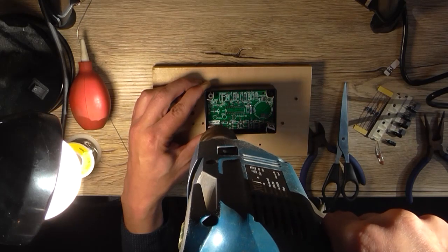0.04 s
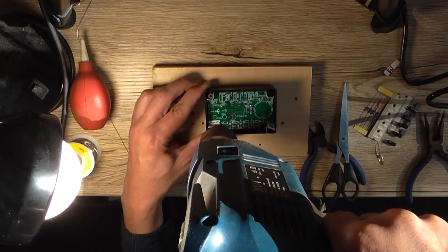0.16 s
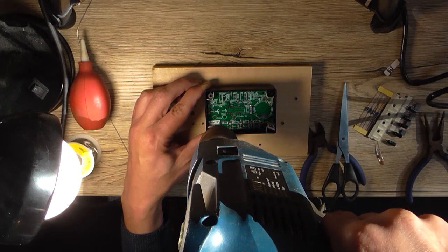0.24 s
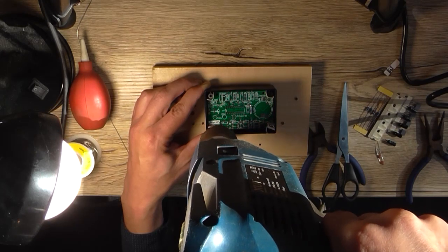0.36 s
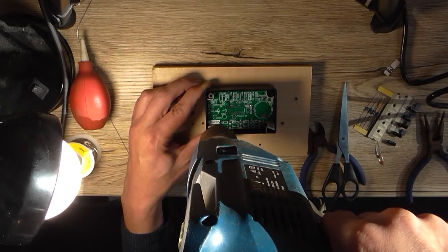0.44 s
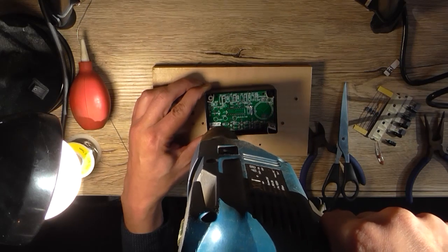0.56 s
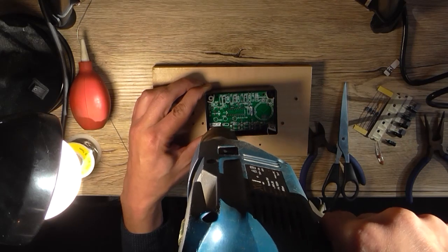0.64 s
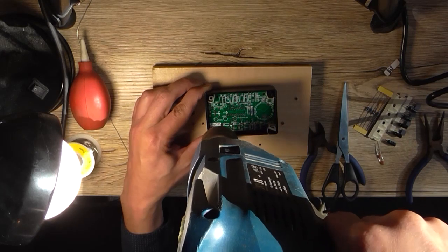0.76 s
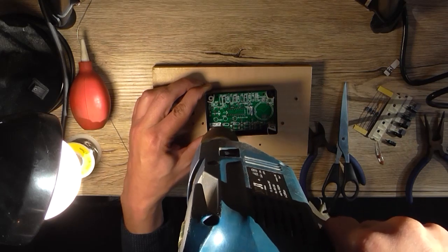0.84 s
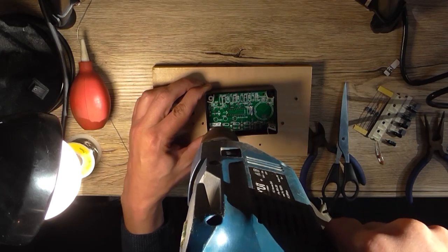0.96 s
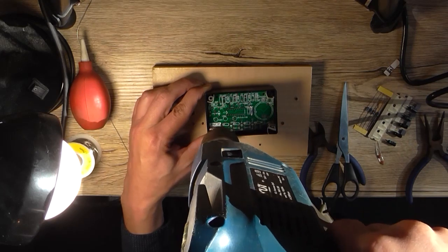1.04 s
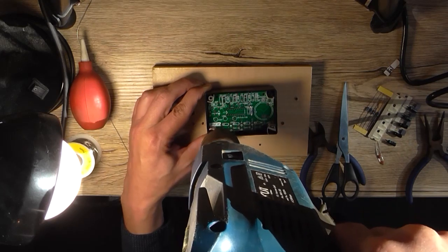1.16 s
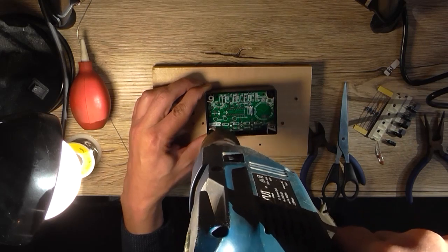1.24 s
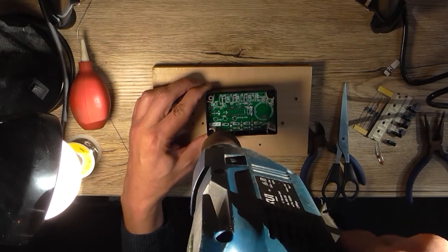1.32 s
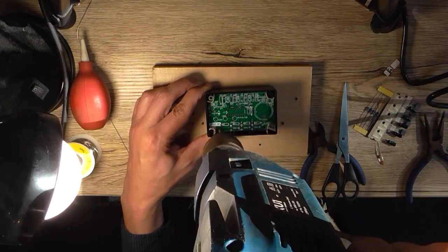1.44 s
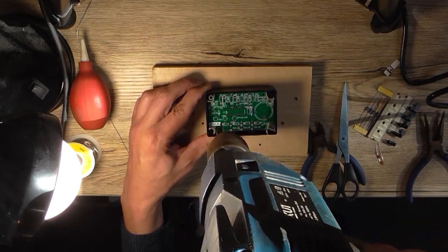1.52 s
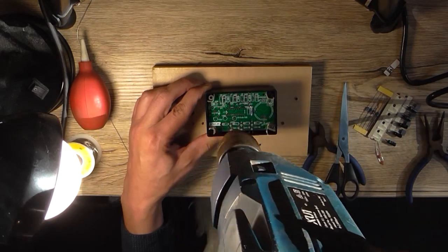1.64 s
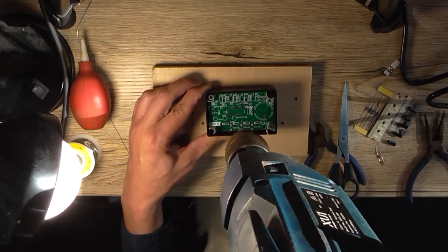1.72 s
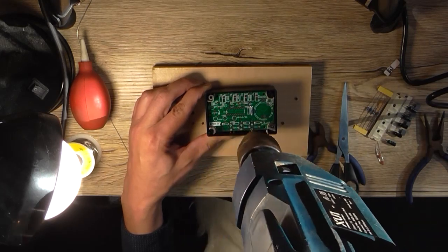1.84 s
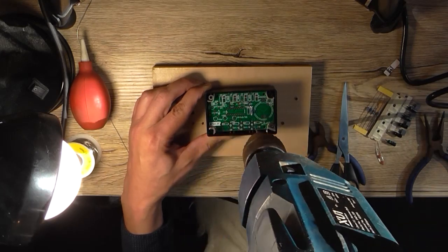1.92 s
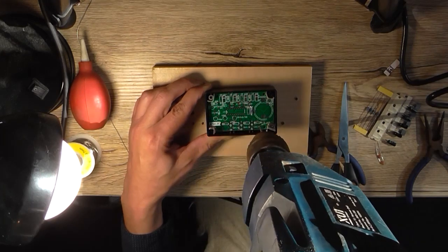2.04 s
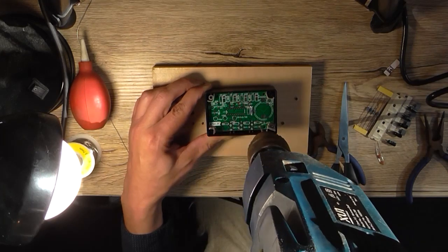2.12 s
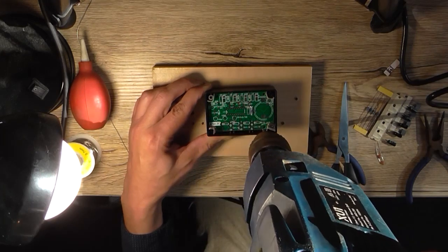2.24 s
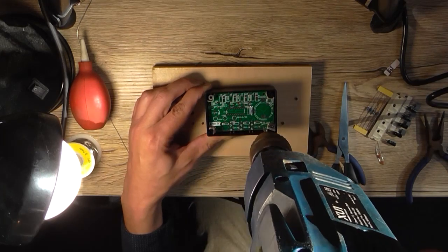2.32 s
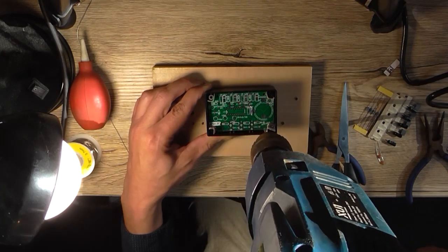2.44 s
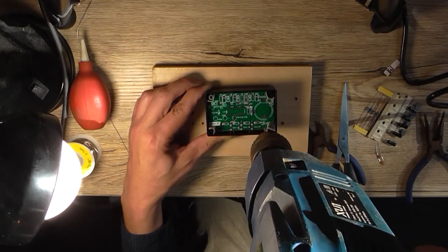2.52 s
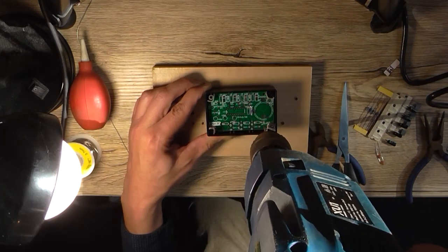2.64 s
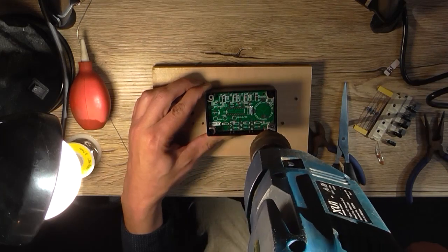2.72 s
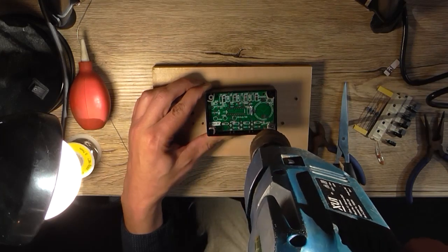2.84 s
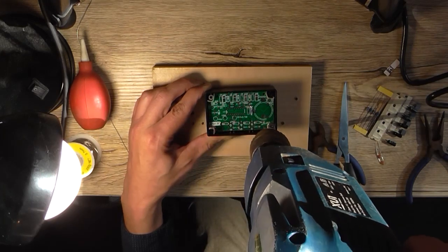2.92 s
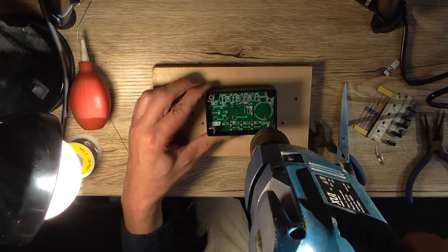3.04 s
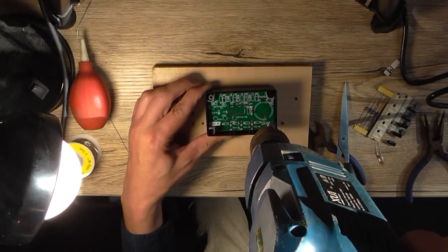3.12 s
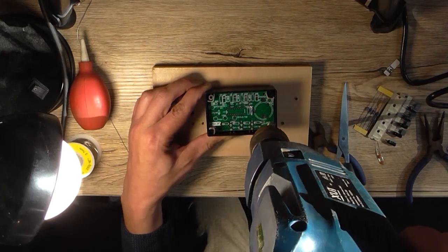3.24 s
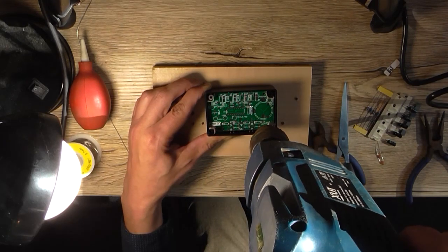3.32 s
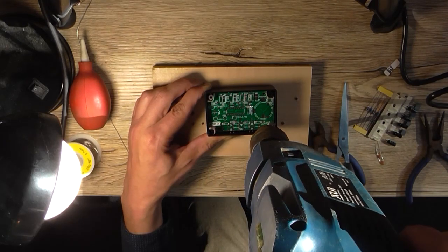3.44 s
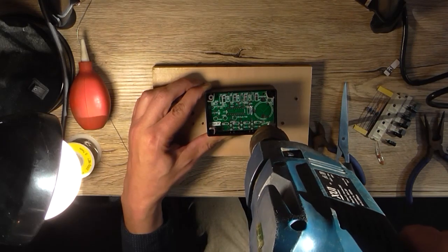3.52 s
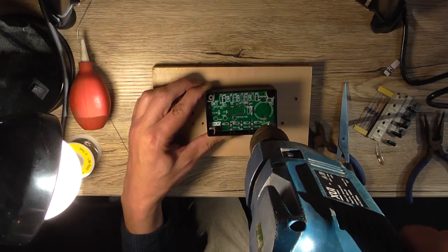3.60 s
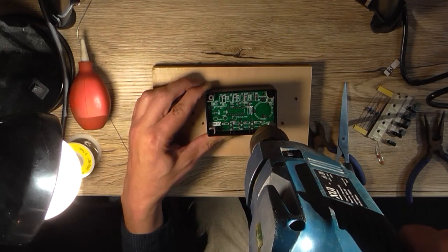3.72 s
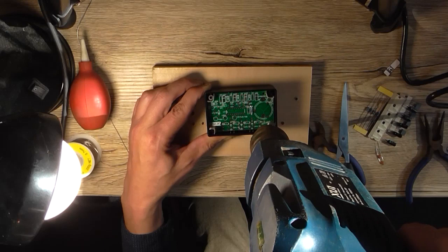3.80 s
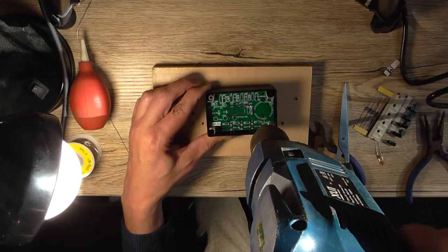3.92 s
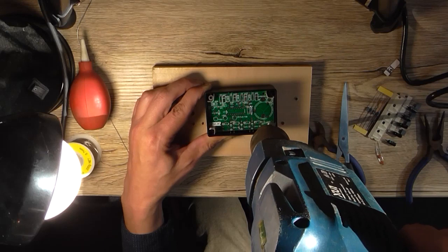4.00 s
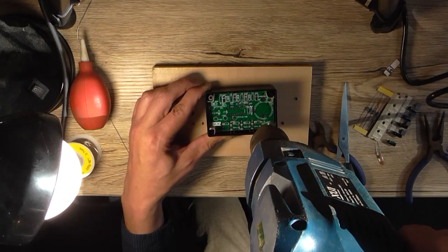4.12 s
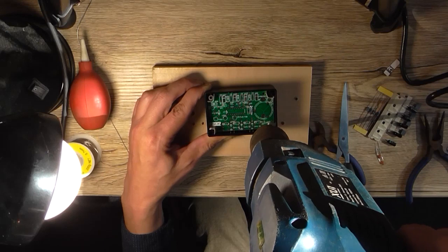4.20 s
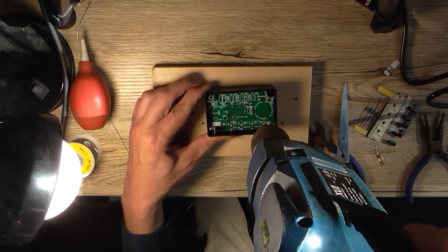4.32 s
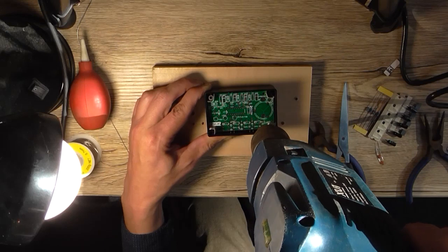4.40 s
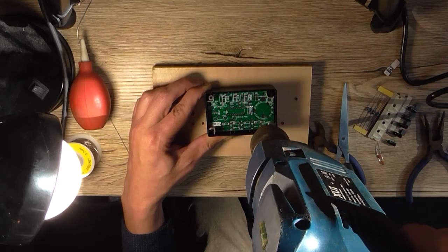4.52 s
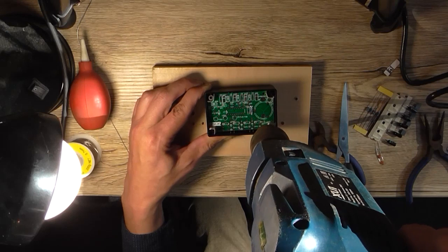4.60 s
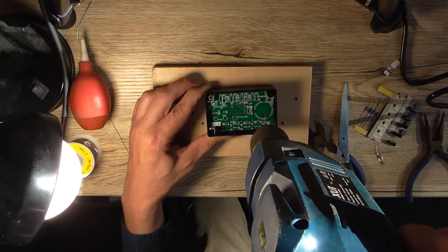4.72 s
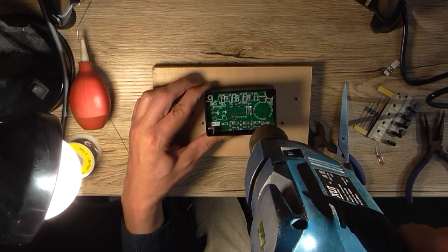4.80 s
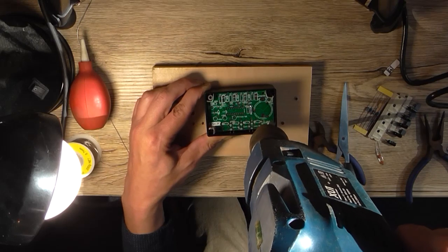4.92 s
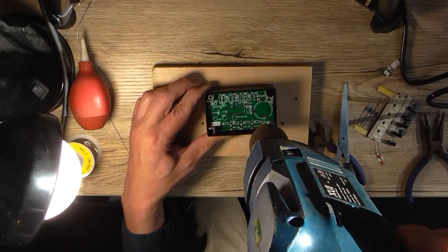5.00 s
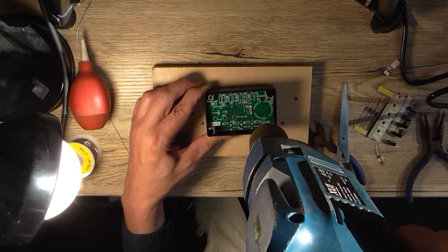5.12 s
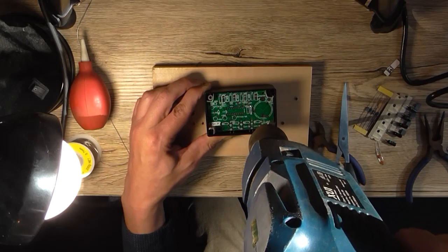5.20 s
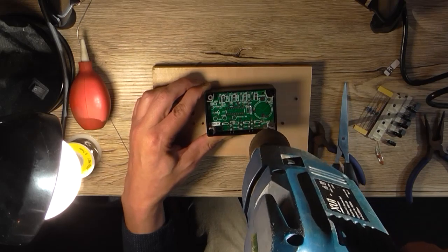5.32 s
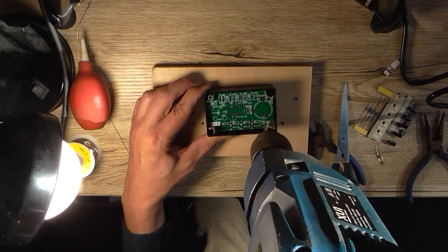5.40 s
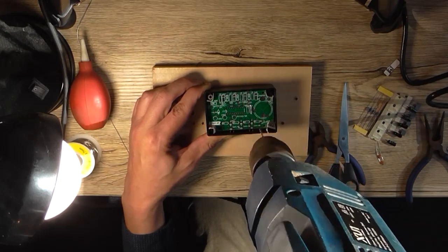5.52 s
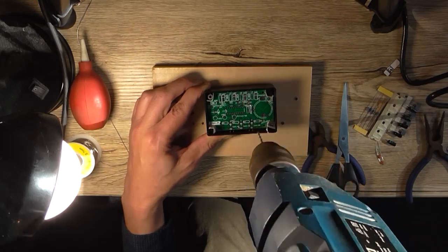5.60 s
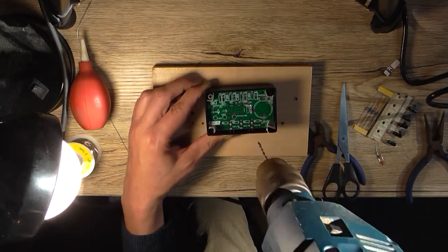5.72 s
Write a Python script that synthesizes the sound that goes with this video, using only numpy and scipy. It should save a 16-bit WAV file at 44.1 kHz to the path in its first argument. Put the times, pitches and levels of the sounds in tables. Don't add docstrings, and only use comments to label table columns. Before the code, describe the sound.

An electric drill whirrs up and coasts down, its bit skitters and knocks on a bench, then it bores again in two pulls.

```python
import sys
import numpy as np
from scipy import signal
from scipy.fft import rfft, irfft, next_fast_len
from scipy.io import wavfile
from scipy.ndimage import uniform_filter1d

SR = 44100
rng = np.random.default_rng(int(sys.argv[2]) if len(sys.argv) > 2 else 0)


def makeup_ratio(level_db):
    decades = np.asarray(level_db, float) / 20
    return 10 ** decades


def dump(signal):
    limited = np.clip(np.atleast_2d(signal).T, -1, 1)
    pcm = np.round(limited * 32767).astype(np.int16)
    wavfile.write(sys.argv[1], SR, pcm)


N = 253575
TIME = np.arange(N) / SR


def evened(x):
    return x / np.sqrt(np.mean(x ** 2) + 1e-20)


def read(points, hz):
    f, value = np.transpose(points)
    return np.interp(np.log(hz + 1), np.log(f + 1), value)


def filtered(x, gain_at):
    size = next_fast_len(N)
    return irfft(rfft(x, size) * gain_at(np.fft.rfftfreq(size, 1 / SR)), size)[..., :N]


def wander(rate_hz):
    size = next_fast_len(N // 16 + 1)
    hz = np.fft.rfftfreq(size, 16 / SR)
    slow = irfft(rfft(rng.standard_normal(size)) / (1 + (hz / rate_hz) ** 4), size)
    return np.interp(TIME, np.arange(size) * 16 / SR, evened(slow))


def ring(x, hz, width_hz):
    return signal.lfilter(*signal.iirpeak(hz, hz / width_hz, SR), x)


def path_gain(points, hz):
    return makeup_ratio(read(points, hz[::64])).repeat(64)[:N]


def body_gain(hz):
    # (frequency [Hz], level per Hz [dB])
    colour = [(15, -73), (25, -59), (123, -29), (161, -47), (190, -11.5), (427, -7.5), (677, -6.5),
              (796, -17), (1290, -12), (2480, -15.5), (2840, -6.5), (4610, 8.5), (8590, -25),
              (11900, -21.5), (16000, -33)]
    # (frequency [Hz], width [Hz], level over the colour [dB])
    resonances = [(144, 43, 0), (204, 16.6, 0.5), (316.7, 11, 13), (350, 11, 3), (428, 5.1, 9.5),
                  (596, 88, 7), (715, 74, 2.5), (712, 740, -1.5), (1290, 390, 5.5), (1627, 77, 6),
                  (2870, 30, 8.5), (3340, 160, 3), (3210, 560, 3), (4030, 910, 0.5), (5170, 68, 6.5),
                  (5660, 90, 8.5), (11340, 310, 2)]
    peaks_db = sum(db / (1 + (2 * (hz - f) / w) ** 2) for f, w, db in resonances)
    return makeup_ratio(read(colour, hz) + peaks_db)


def column(index):
    # (time [s], tool level [dB], pressure on the bench [dB], shake of the bench legs [dB])
    bursts = [
        [(0.0, -28, 3, -53), (0.13, -25, 7, -34), (0.156, -25, 1, -50.5), (0.77, -26.5, -6.5, -51.5),
         (0.896, -27.5, -14.5, -52), (1.2, -27, -25, -50.5), (1.53, -27, -24, -60), (1.72, -31, -64, -68),
         (1.814, -37.5, -21, -58), (1.95, -71, 9, -76)],
        [(3.893, -28.5, -31, -49), (3.917, -27, -17, -37), (4.129, -24.5, -14.5, -47.5), (4.25, -27, -3, -50),
         (4.409, -28.5, 2, -59), (4.559, -24.5, -1.5, -65), (5.215, -27.5, -11, -50.5),
         (5.3, -25.5, -19.5, -56), (5.75, -27, -25.5, -67)],
    ]
    out_db = np.full(N, -150.)
    for rows in bursts:
        s, value = np.transpose(rows)[[0, index]]
        inside = (TIME >= s[0]) & (TIME <= s[-1])
        out_db[inside] = np.interp(TIME[inside], s, value)
    return makeup_ratio(out_db)


def lines(wheel_hz, turns, orders, levels_db, flutter_db, through_body=True):
    out = np.zeros(N)
    for order, db in zip(orders, levels_db):
        swing = makeup_ratio(db + flutter_db * wander(13.2))
        if through_body:
            swing *= body_gain(order * wheel_hz[::64]).repeat(64)[:N]
        out += swing * np.cos(2 * np.pi * (order * turns + rng.random()))
    return evened(out) if through_body else np.sqrt(2) * out


def rotor():
    # (squeezed [s], let go [s], finger release [s], strength, drag of the bit afterwards [Hz/s])
    pulls = [
        (0.009, 0.76, .047, 1.053, 447),
        (3.909, 4.104, .046, .986, 489),
        (4.392, 5.297, .144, .98, 441.5),
    ]
    # (time [s], rotor speed [Hz])
    starts = [
        (0, 170),
        (3.89, 203),
    ]
    # (rotor speed [Hz], acceleration [Hz/s])
    torque = [(250, 1252), (400, 934), (500, 776), (600, 473.7), (750, 375)]
    squeeze_s, windage_per_s, slowest_hz = .109, .401, 60
    step_s = 256 / SR
    t = np.arange(0, N / SR + step_s, step_s)
    power, drag, hz = np.zeros((3, len(t)))
    for on, off, release, strength, drag_hz in pulls:
        squeezed = np.clip((t - on) / squeeze_s, 0, 1)
        power += strength * squeezed * np.clip(1 - (t - off) / release, 0, 1)
        drag[t >= on] = drag_hz
    start_at = {int(s / step_s): start_hz for s, start_hz in starts}
    for k in range(len(t)):
        now = hz[k] = start_at.get(k, hz[k])
        push = power[k] * np.interp(now, *np.transpose(torque))
        push -= max(1 - power[k], 0) * (drag[k] + windage_per_s * now)
        hz[k + 1:k + 2] = max(now + step_s * push, slowest_hz)
    return np.interp(TIME, t, hz), np.interp(TIME, t, np.minimum(power, 1))


def drill():
    rotor_hz, powered = rotor()
    wheel_hz, pace = rotor_hz / 5, rotor_hz / rotor_hz.max()
    turns = np.cumsum(wheel_hz) / SR
    hiss, press = makeup_ratio(2) * column(index=1), np.minimum(column(index=2), 3)
    out = rubbing(rotor_hz, turns, pace, powered, hiss, press)
    out += whine(wheel_hz, turns, pace, powered, hiss)
    out += rotor_third(wheel_hz, turns, pace, powered, hiss)
    out += tooth_errors(wheel_hz, turns, pace, hiss, press)
    out += windings(pace, powered, hiss, press)
    out += cover_panel(wheel_hz, turns, hiss)
    return out + strong_families(wheel_hz, turns, pace, powered, hiss, press)


def rubbing(rotor_hz, turns, pace, powered, hiss, press):
    deep = column(index=3) * makeup_ratio(2.5 * wander(6.8))
    rumble = hiss * (press + 0.046 + .25 * powered * (1 - pace)) * makeup_ratio(-5.5 + 2.5 * wander(5.2))
    boom = hiss * makeup_ratio(-2.5 - 18 * pace + 2.5 * wander(4.1))
    boom *= (1 + .3 * powered) / (1 + .5 * press)
    drone = makeup_ratio(-12) * hiss * (0.79 + 0.5 * powered)
    rattle = hiss * makeup_ratio(.5 - 8 * pace)
    fizz = hiss * makeup_ratio(-4.5 - 2 * pace) * (1 - np.exp(-(rotor_hz / 204) ** 2))

    sparks = 1 + 0.083 * powered * np.cos(2 * np.pi * 100 * TIME)
    chatter = 1 + 0.14 * np.cos(2 * np.pi * 5 * turns) + 0.078 * np.cos(2 * np.pi * turns)
    noise = rng.standard_normal(N) * sparks * chatter
    noise *= makeup_ratio(0.15 * wander(300) + 0.48 * wander(25.74))

    levels = [deep, rumble, boom, drone, rattle, fizz]
    edges_hz = [(10, 150), (150, 490), (510, 770), (790, 2300), (2300, 7500), (7500, 20000)]
    out = np.zeros(N)
    for level, (lo, hi) in zip(levels, edges_hz):
        def band_gain(hz):
            skirts = (1 + (lo / (hz + 1)) ** 18) * (1 + (hz / hi) ** 18)
            return body_gain(hz) / np.sqrt(skirts)
        out += makeup_ratio(-1.0) * level * evened(filtered(noise, band_gain))
    return out


def whine(wheel_hz, turns, pace, powered, hiss):
    mesh_orders, mesh_db = [19, 20, 21, 22, 23, 24, 25, 26, 27, 30, 32, 34, 35, 39, 40, 41, 42, 44, 45], [-6, -1, -5, -8, -9, -3, -6, -7, -10, -10, -10, -8, -11, -7,
                                                 -11, -9, -2, -7, -11]
    load_orders, load_db = [29, 30, 31], [0, -3, -3]
    fan_orders, fan_db = [54, 56, 58, 61, 62, 71], [-6, -6, -9, 0, -7, -1]
    wheel_orders, wheel_db = [1, 2], [-2, -42]
    pull_orders, pull_db = [12, 13], [1, -2]
    smooth = uniform_filter1d(hiss, size=8000) * (hiss > 1e-5)
    mesh_level = makeup_ratio(-10) * smooth * pace ** 1.5
    out = mesh_level * lines(wheel_hz, turns, mesh_orders, mesh_db, flutter_db=4.)
    out += makeup_ratio(-7) * powered * mesh_level * lines(wheel_hz, turns, load_orders, load_db, flutter_db=3.)
    fan = lines(wheel_hz, turns, fan_orders, fan_db, flutter_db=3., through_body=False)
    out += makeup_ratio(-17) * smooth * np.sqrt(pace) * ring(fan, 7750, width_hz=1600)
    wheel_level = makeup_ratio(-24) * smooth * (powered + .4) * pace ** 7
    out += wheel_level * lines(wheel_hz, turns, wheel_orders, wheel_db, flutter_db=2.)
    pull_level = makeup_ratio(-16.5) * smooth * pace * (powered + .45)
    return out + pull_level * lines(wheel_hz, turns, pull_orders, pull_db, flutter_db=2.)


def rotor_third(wheel_hz, turns, pace, powered, hiss):
    orders, levels_db = [15, 16, 14], [0, -5, -9]
    # (frequency [Hz], gain [dB])
    cover = [(450, -36), (600, -22), (700, -20), (1000, -29), (1200, -21), (1600, -12), (1780, -14),
             (1950, -26), (2400, -34)]
    level = hiss * makeup_ratio(-6 * (2 - powered) * pace) * path_gain(cover, orders[0] * wheel_hz)
    return level * lines(wheel_hz, turns, orders, levels_db, flutter_db=2.5, through_body=False)


def tooth_errors(wheel_hz, turns, pace, hiss, press):
    orders = [6, 7, 8, 11, 13, 17, 26]
    level = hiss * (makeup_ratio(-21 - 10 * pace) + makeup_ratio(-16) * press)
    return level * lines(wheel_hz, turns, orders, np.zeros(len(orders)), flutter_db=4.5)


def windings(pace, powered, hiss, press):
    # (frequency [Hz], level under the tool [dB])
    buzz = [(100, -34), (200, -14), (300, -44)]
    hum = sum(makeup_ratio(db + 2 * wander(12)) * np.cos(2 * np.pi * hz * TIME) for hz, db in buzz)
    return hiss * powered * (1 - pace) / (1 + press) * hum


def cover_panel(wheel_hz, turns, hiss):
    order, panel_hz, width_hz = 24, 2220, 80
    gain = makeup_ratio(-14) / (1 + (2 * (order * wheel_hz - panel_hz) / width_hz) ** 2)
    return hiss * gain * np.cos(2 * np.pi * order * turns)


def strong_families(wheel_hz, turns, pace, powered, hiss, press):
    # (wheel-turn multiples, levels [dB])
    families = [
        ([5, 6], [-1.5, -21]),
        ([10], [0]),
        ([4], [0]),
        ([9], [0]),
        ([36, 37, 38], [0, -2, -5]),
        ([48, 47, 49, 50, 51], [2, -3, -3, -6, -11]),
    ]
    # (level through shell [dB], level through bench [dB])
    low_db = [(-9, -2), (-12, -2), (-21, -5), (-13, -24)]
    # (level at full speed [dB], loss at rest [dB])
    steel_db = [(-8, 21), (-18, -22)]
    # (frequency [Hz], gain [dB])
    shell, plank, steel = [(350, -32), (450, -16), (560, -1), (690, 0), (760, -5), (880, -27), (1300, -26),
                           (1600, -9), (1900, -26)], [(180, -26), (222, -20), (250, -8), (320, -8), (370, 0), (430, 2),
                                          (500, -7), (620, -9), (800, -18), (950, -21), (1150, -8),
                                          (1310, 3), (1450, -9), (1850, -18)], [(3050, -28), (3350, -12), (3800, -5), (4100, -1),
                                                         (4600, 0), (5000, -2), (5350, 1), (5500, -2),
                                                         (5750, -16), (6500, -17)]
    out = np.zeros(N)
    for k, (orders, sides_db) in enumerate(families):
        hz = orders[0] * wheel_hz
        if k < len(low_db):
            shell_db, bench_db = low_db[k]
            level = makeup_ratio(shell_db - 3 * powered * pace) * path_gain(shell, hz)
            level += press * makeup_ratio(bench_db - 20 * (1 - powered) * pace ** 2) * path_gain(plank, hz)
        else:
            top_db, lost_db = steel_db[k - len(low_db)]
            level = makeup_ratio(top_db - lost_db * (1 - pace)) * path_gain(steel, hz)
        out += hiss * level * lines(wheel_hz, turns, orders, sides_db, flutter_db=2.8, through_body=False)
    return out


def run_out():
    # (time [s], level [dB], wheel speed [Hz])
    slowing = [(1.88, -58, 17), (1.97, -59, 15), (2.1, -58.5, 17.6), (2.3, -64, 11), (2.5, -69, 10),
               (2.6, -66, 6)]
    # (frequency [Hz], width [Hz], level [dB])
    whisper = [(449, 30, -3), (970, 370, -2), (1970, 160, -7.5), (4290, 230, -3.5), (5430, 1200, -7.5)]
    s, db, turns_hz = np.transpose(slowing)
    throb = 1 + 0.068 * np.cos(2 * np.pi * np.cumsum(np.interp(TIME, s, turns_hz)) / SR)
    noise = rng.standard_normal(N)
    rub = sum(makeup_ratio(level) * evened(ring(ring(noise, hz, w), hz, 2 * w)) for hz, w, level in whisper)
    return makeup_ratio(np.interp(TIME, s, db, -150, -150)) * throb * rub


def skids():
    # (time [s], peak level [dB], rise [s], t60 [s])
    slip_clumps = [(2.572, -37, 0.0024, 0.096), (2.594, -33, 0.0036, 0.28), (2.6394, -46.5, 0.0093, 0.17),
                   (2.6775, -42, 0.0065, 0.41), (2.7472, -48, 0.0054, 0.16), (2.7742, -42.5, 0.0012, 0.25),
                   (2.7906, -43.5, 0.0042, 0.15), (2.8706, -65, 0.0074, 0.2), (2.8865, -41, 0.0038, 0.2),
                   (2.893, -48, 0.0055, 0.12), (2.9305, -40.5, 0.0014, 0.33), (2.945, -42, 0.003, 0.3),
                   (2.95, -38.5, 0.006, 0.8), (2.996, -41.5, 0.0081, 0.47), (3.016, -38, 0.0066, 0.15),
                   (3.027, -35.5, 0.0032, 0.15), (3.037, -37.5, 0.004, 0.185), (3.045, -39, 0.0045, 0.14),
                   (3.081, -42, 0.008, 0.15), (3.094, -35.5, 0.004, 0.57), (3.105, -40.5, 0.0043, 0.22),
                   (3.129, -36, 0.008, 0.2), (3.146, -35.5, 0.0056, 0.2), (3.166, -33.5, 0.0033, 0.15),
                   (3.175, -36.5, 0.0054, 0.15), (3.1855, -30.5, 0.0018, 0.2), (3.197, -40, 0.0055, 0.4),
                   (3.2094, -40, 0.013, 0.81), (3.2796, -42, 0.003, 0.2), (3.285, -35.5, 0.023, 0.35),
                   (3.3083, -44, 0.022, 0.15), (3.339, -40, 0.01, 0.13), (3.366, -40, 0.004, 0.1),
                   (3.3755, -38.5, 0.003, 0.1), (3.46, -55, 0.0018, 0.042)]
    # (frequency [Hz], width [Hz], level [dB])
    chuck = [(1410, 220, -8.5), (1850, 73, 1), (2197, 13, 3), (3210, 34, 1.5), (3950, 96, -6.5),
             (4860, 76, 5.5), (5440, 52, -3.5), (5860, 81, -4.5), (7680, 110, -37), (9480, 240, -12),
             (10160, 150, -16), (11950, 220, -8.5), (12060, 170, -20)]
    power = np.zeros(N)
    for s, db, rise_s, t60_s in slip_clumps:
        t = np.maximum(TIME - s, 0)
        swell = t / rise_s * np.exp(1 - t / rise_s)
        tail = makeup_ratio(-9 - 60 * t / t60_s) ** 2 * np.minimum(t / rise_s, 1)
        power += makeup_ratio(db) ** 2 * (swell ** 2 + tail)
    slips = rng.standard_normal(N) * makeup_ratio(2.5 * wander(130))
    steel = np.zeros(N)
    for k, (hz, width_hz, db) in enumerate(chuck):
        steel += (-1) ** k * makeup_ratio(db) * ring(slips, hz, width_hz + 0.021 * hz)
    scrape = filtered(slips, lambda hz: 1 / (1 + (hz / 6500) ** 3) / (1 + (700 / (hz + 1)) ** 2))
    return np.sqrt(power) * makeup_ratio(-7) * evened(evened(steel) + makeup_ratio(-7.5) * evened(scrape))


def knocks():
    # (time [s], peak level [dB], brightness [dB], ring factor)
    hits = [(1.788, -23, 23.5, 0.44), (1.824, -29, 3, 0.94), (2.522, -35, -15, 0.72),
            (2.578, -21, -5, 0.79), (2.608, -23, -10, 1), (2.638, -29.5, -7, 1), (2.99, -20, -10, 0.27),
            (3.279, -29.5, 3, 1), (3.335, -28, -12, 1), (3.375, -10, -13, 0.74), (3.41, -22, -20, 0.9),
            (3.46, -18, -7, 0.66), (3.893, -18, -23, 0.93)]
    # (frequency [Hz], level [dB], t60 [s])
    bench, case = [(105, -17.5, 0.23), (211, -2, 0.21), (298, -3, 0.14), (338, -5, 0.092),
                   (422, 3.5, 0.048), (500, -19, 0.11), (604, -11, 0.074)], [(904, 7.5, 0.029), (1360, 13, 0.023), (1630, -13.5, 0.22),
                                  (1940, 1, 0.023)]
    out, t = np.zeros(N), np.arange(SR // 2) / SR
    onset = 1 - np.exp(-t / 0.0039)
    for s, db, bright_db, longer in hits:
        modes = bench + [(hz, level + bright_db, t60) for hz, level, t60 in case]
        detune = rng.uniform(0.88, 1.041, len(modes))
        sound = np.zeros(len(t))
        for (hz, level, t60), d in zip(modes, detune):
            sound += makeup_ratio(level - 60 * t / (t60 * longer)) * np.sin(2 * np.pi * hz * d * t)
        part = out[round(s * SR):][:len(t)]
        part += makeup_ratio(db - 17.5) * (sound * onset)[:len(part)]
    return out


def echoes(x):
    # (frequency [Hz], level [dB])
    wet_db = [(60, -17.5), (300, -16.5), (1000, -3), (3000, -9), (6000, -13.5), (9000, -2.5), (14000, -5)]
    size, t60_s = SR // 3, .17
    taps = rng.choice([-1., 1.], (2, size)) * (rng.random((2, size)) < .08)
    taps *= makeup_ratio(-60 * np.arange(size) / SR / t60_s)
    taps /= np.linalg.norm(taps, axis=1, keepdims=True)
    wet = signal.oaconvolve(x[None], taps, axes=1)[:, :N]
    return filtered(wet, lambda hz: makeup_ratio(read(wet_db, hz)))


def quiet_room():
    # (frequency [Hz], level per Hz [dB])
    floor = [(15, -44), (25, -33), (59, -22.5), (263, -18), (285, -16), (394, -17.5), (545, -17),
             (591, -23.5), (641, -22), (1020, -27), (2160, -35.5), (2840, -39), (16000, -42.5)]
    # (frequency [Hz], left-right likeness)
    likeness = [(60, 0.61), (240, -0.27), (950, -0.76), (3770, 0.27), (15000, 0.43)]
    # (frequency [Hz], rms level [dB])
    lamp = [(301.5, -65), (333.8, -77), (398.4, -70), (500.6, -71.5), (597.5, -72), (899.0, -78.5),
            (1001, -85.5), (1098, -74.5), (1200, -99.5), (1297, -80.5), (2099, -81), (2299, -94)]
    same = lambda hz: np.clip(read(likeness, hz), 0, 1)
    left, other = rng.standard_normal((2, N))
    right = filtered(left, same) + filtered(other, lambda hz: np.sqrt(1 - same(hz) ** 2))
    air = evened(filtered(np.array([left, right]), lambda hz: makeup_ratio(read(floor, hz))))
    hum = np.zeros(N)
    for hz, db in lamp:
        hum += makeup_ratio(db + 2 + 3.5 * wander(9)) * np.cos(2 * np.pi * (hz * TIME + rng.random()))
    return makeup_ratio(-53.5 - 4.5) * air + hum


def scene():
    # (frequency [Hz], left minus right [dB])
    lean = [(60, -2), (180, -4.5), (550, -2.5), (1650, 0.5), (4970, 0.5), (15000, -1.5)]
    tool = drill() + run_out() + skids() + knocks()
    near = filtered(tool + echoes(tool), lambda hz: makeup_ratio(np.outer([.5, -.5], read(lean, hz))))
    return near + quiet_room()


def top_cut(x):
    return signal.sosfilt(signal.butter(12, 15790, fs=SR, output="sos"), x)


def record(dry):
    return top_cut(dry)


dry = scene()
out = record(dry)
dump(out)
```